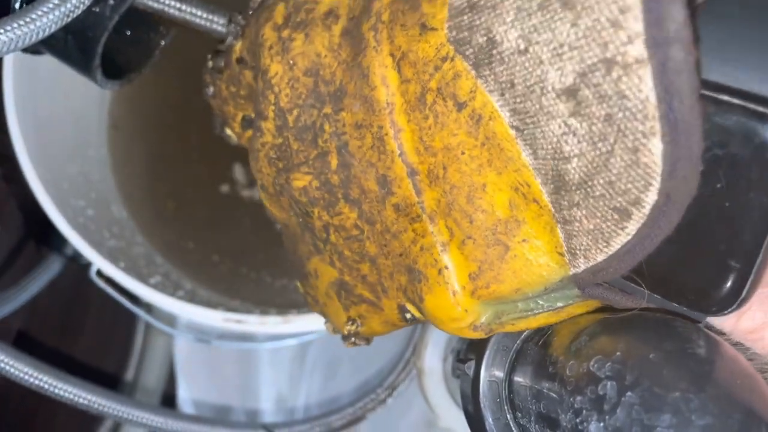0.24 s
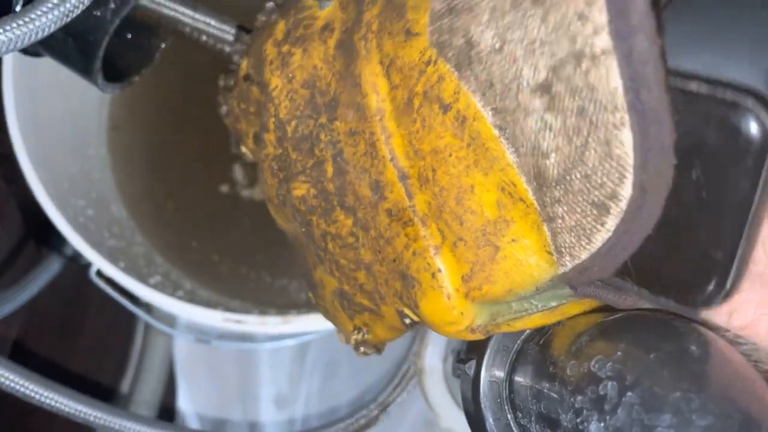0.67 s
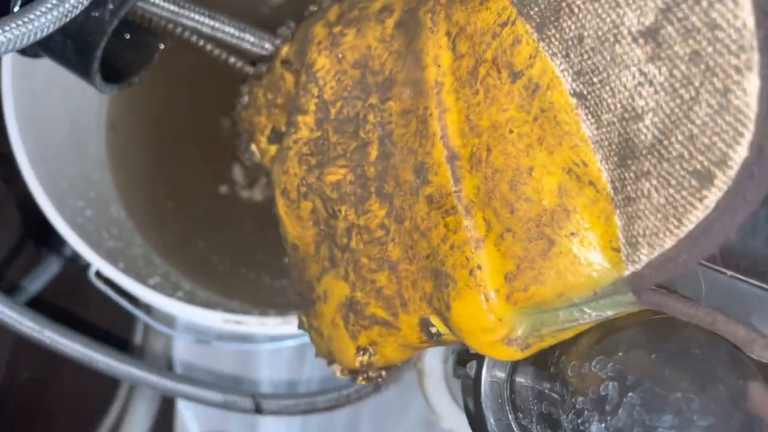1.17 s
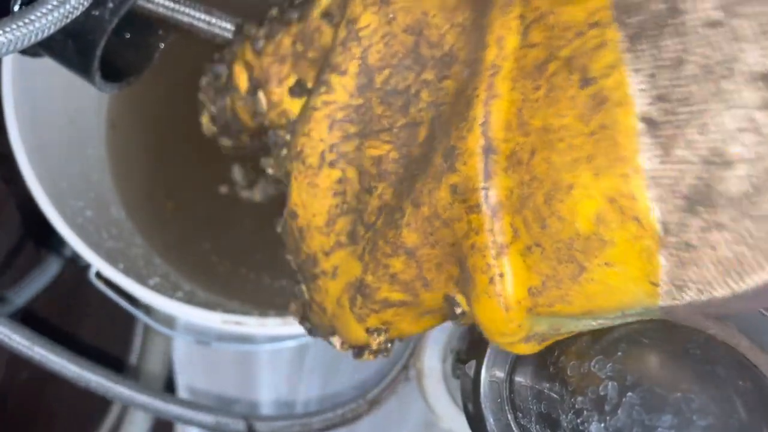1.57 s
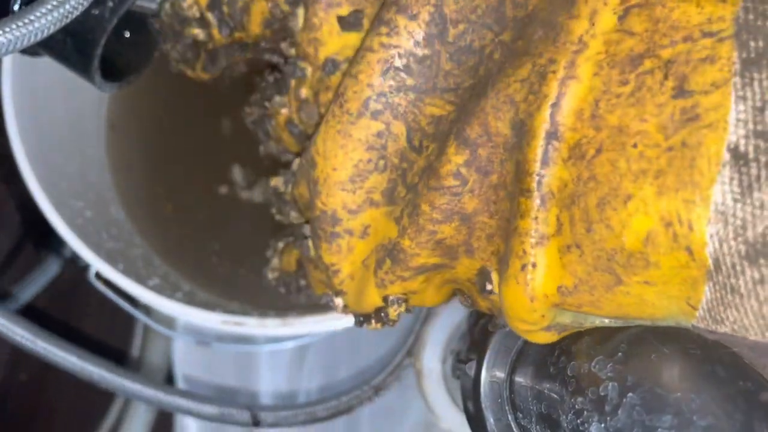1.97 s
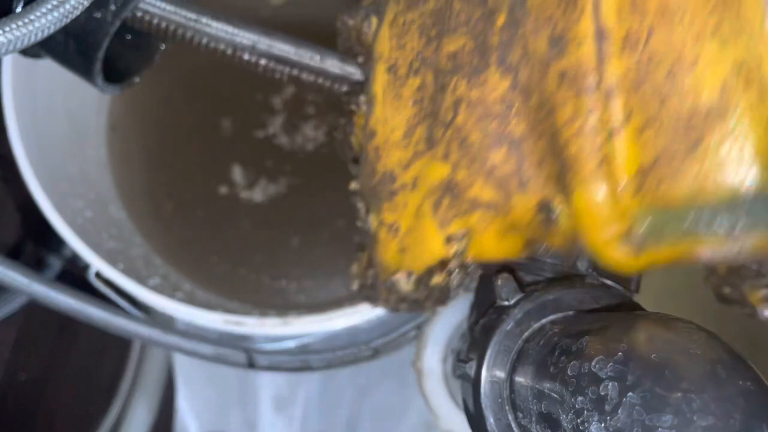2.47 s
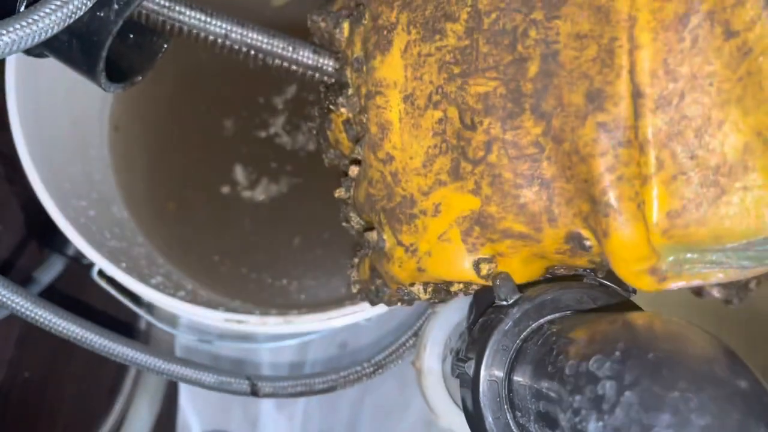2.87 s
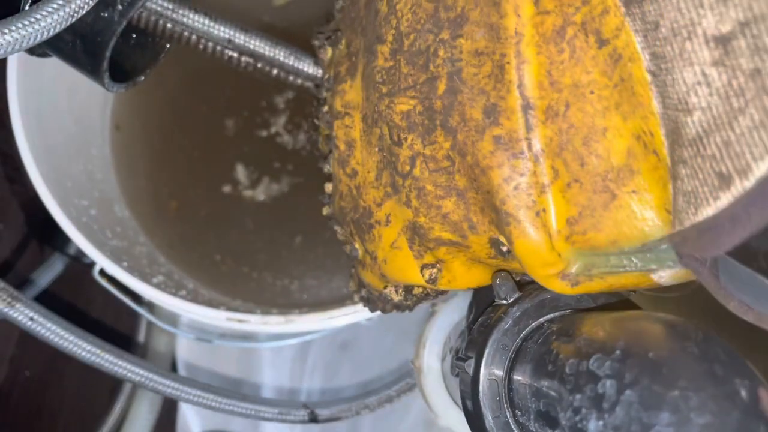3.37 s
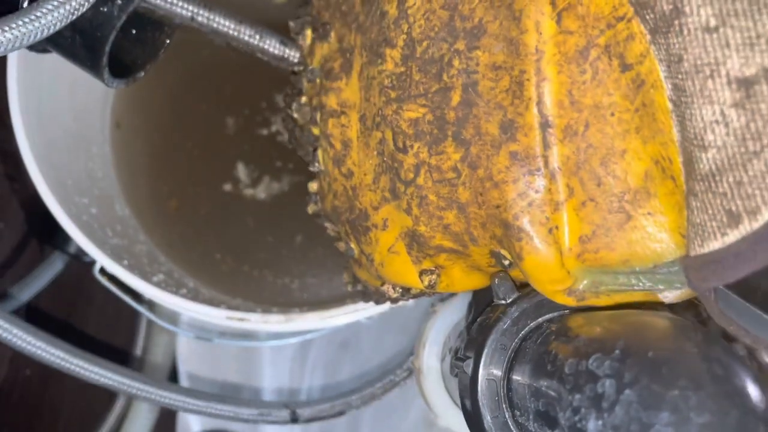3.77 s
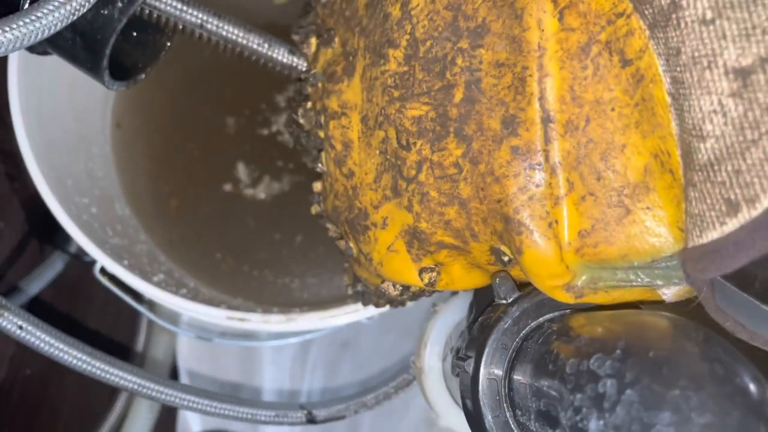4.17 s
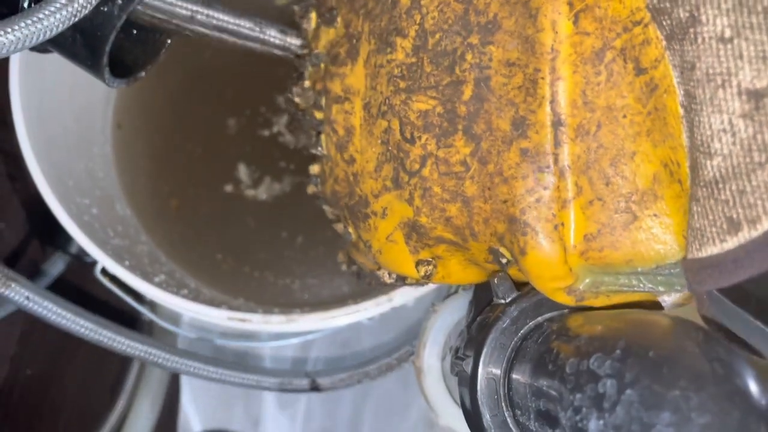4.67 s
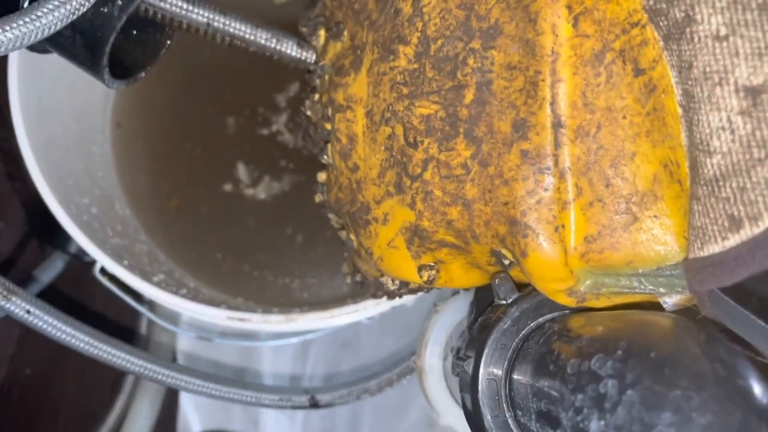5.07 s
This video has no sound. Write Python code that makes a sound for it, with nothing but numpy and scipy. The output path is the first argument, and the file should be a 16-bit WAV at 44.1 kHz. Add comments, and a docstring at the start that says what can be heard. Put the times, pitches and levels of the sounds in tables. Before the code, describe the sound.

A drain-cleaning machine hums, rumbles and hisses close by, its hollow drum rattling and knocking while the steel cable judders through a glove in four pushes.

```python
"""A motor hums and hisses close by in a small room: an electric drain machine spinning its coiled steel cable.
The frame rumbles and thumps, the hollow drum rattles and knocks, short thin tones sound near 12 kHz, and the
cable ticks on steel. Four times the cable is pushed into the pipe: its coils judder through the glove in an
uneven low wave, with rubbing coloured by the pipe's air column. Steady layers are shaped noise and excited
resonances; single blows are dying modes and noise snaps, and the walls answer with a short tail."""
import sys
import numpy as np
from scipy import signal
from scipy.fft import rfft, irfft, next_fast_len
from scipy.io import wavfile
from scipy.ndimage import uniform_filter1d, map_coordinates

SR = 44100
rng = np.random.default_rng(int(sys.argv[2]) if len(sys.argv) > 2 else 0)


def store_pcm(level_fs):
    """Save levels as 16-bit WAV."""
    pcm = np.round(np.clip(level_fs, -1, 1) * 32767).astype(np.int16)
    wavfile.write(sys.argv[1], SR, np.atleast_2d(pcm).T)


N = 235273
T = np.arange(N) / SR  # time of each sample [s]

# The running cable: (time [s], frame rumble [dB], rattle [dB], scrape [dB])
RUNNING_LEVELS = [(0.0, -31, -35, -34.5), (0.11, -23.5, -31.5, -35), (0.15, -25, -31.5, -37.5),
                  (0.22, -26, -27.5, -38), (0.6, -24, -29, -35), (0.8, -34, -32.5, -34),
                  (0.93, -22, -28.5, -33.5), (1.01, -28.5, -34.5, -33), (1.1, -30.5, -32, -34.5),
                  (1.45, -33.5, -34.5, -34.5), (1.64, -22, -24.5, -35.5), (1.83, -30.5, -36, -34.5),
                  (1.95, -27, -31, -34.5), (2.22, -30.5, -30.5, -34), (2.39, -24, -32, -33.5),
                  (2.5, -34, -32, -34), (2.64, -28.5, -32, -33.5), (2.8, -35, -36.5, -34.5),
                  (3.13, -26.5, -28.5, -32), (3.33, -27, -32, -33), (3.9, -24.5, -35, -32.5),
                  (4.1, -31, -29.5, -31.5), (4.25, -26, -30.5, -34), (4.75, -15.5, -30, -38),
                  (5.04, -25, -25, -29.5), (5.2, -26, -28.5, -33.5), (5.33, -19, -32.5, -32.5)]
# One list per push: (time [s], coils passing [Hz], judder [dB], rub [dB], rasp [dB])
CABLE_PUSHES = [
    [(0.24, 72.3, -22, -39, -46), (0.262, 74.4, -18, -36, -38), (0.296, 78, -14.5, -24, -34),
     (0.312, 90, -28, -24, -29.5), (0.325, 102, -13, -20, -29), (0.342, 110.6, -23, -18, -26),
     (0.358, 114, -6, -19, -28.5), (0.38, 101.4, -24, -20, -28), (0.398, 104, -17, -18.5, -33),
     (0.42, 118.3, -31, -18.5, -31), (0.446, 130.5, -34, -18, -27.5), (0.485, 131.8, -24, -15, -25.5),
     (0.53, 136.4, -22, -17.5, -35), (0.56, 130, -34, -25.5, -54), (0.59, 108.9, -22, -30.5, -51),
     (0.62, 99, -26, -39, -52)],
    [(3.42, 68.3, -11, -40, -50), (3.465, 69.7, -22, -32, -42), (3.49, 70.3, -12, -26.5, -48),
     (3.525, 71.1, -6.5, -23.5, -34), (3.55, 82, -13, -24, -41), (3.575, 99.9, -11, -19.5, -26),
     (3.606, 109.8, -6, -18.5, -27.5), (3.632, 116.4, -11, -20.5, -28), (3.66, 123, -8.5, -16, -28),
     (3.685, 117, -19, -30, -37), (3.718, 86.3, -9, -24, -41), (3.75, 73.9, -9.5, -29, -34),
     (3.775, 72, -11, -24.5, -37), (3.797, 70.7, -8.5, -32, -35), (3.815, 70.3, -21, -41, -55),
     (3.86, 69.5, -23, -37, -39), (3.89, 68.7, -20, -40, -29)],
    [(3.97, 90.5, -45, -35, -48), (4.005, 96.5, -39, -32, -54), (4.045, 111, -33, -29, -48),
     (4.09, 120.9, -26, -29, -52), (4.165, 123.4, -31, -27.5, -42), (4.195, 121.4, -32, -38, -47),
     (4.23, 117.5, -42, -36, -43)],
    [(4.245, 70, -34, -46, -46), (4.275, 70.2, -31, -46, -38), (4.297, 71, -12, -46, -32),
     (4.32, 72, -25, -44, -33), (4.348, 74.5, -9, -26, -32), (4.375, 78.7, -9.5, -27.5, -36),
     (4.408, 81, -13, -25, -33), (4.456, 112.8, -7.5, -22, -29.5), (4.49, 126, -9.5, -21, -31),
     (4.51, 128.6, -20, -20.5, -32), (4.53, 136, -13, -17, -26), (4.548, 143.4, -12, -15.5, -26.5),
     (4.59, 155.5, -16, -18.5, -27), (4.612, 161, -12.5, -16.5, -27), (4.64, 162.7, -17.5, -12, -24),
     (4.67, 160, -14, -17.5, -33), (4.7, 120.8, -13.5, -24, -39), (4.73, 90.6, -12, -34, -52),
     (4.78, 75, -34, -50, -57), (4.82, 71.6, -24, -32, -34), (4.845, 71, -8, -42, -36),
     (4.89, 67.5, -20, -48, -42), (4.95, 64.3, -40, -37, -43)],
]
# Colour of each push: (upper pipe tones [dB], edge above them [dB], overtones of the judder [dB])
PUSH_COLOURS = [(0, -1, 1.5), (0, -2, -1.5), (0, 8, 15), (2, 0.5, -3.5)]
# Blows of the drum: (time [s], level [dB], low thud [dB], middle ring [dB], hard edge [dB])
DRUM_KNOCKS = [(0.06, -22, -11.5, -17, -9), (0.194, -30, -8, -5, -11), (0.203, -33, -14, -12, -6),
               (0.339, -18, -22, -3, -6), (0.376, -25, -8, -3, -17), (0.585, -36, -17, -14, -1),
               (0.754, -20.5, -7, -5, -5), (0.795, -37, -17, -4, 5), (0.818, -32.5, -13, -5, 5.5),
               (0.852, -19.5, -12.5, -3.5, -8.5), (1.165, -32, -9, -6, -2), (1.196, -29, -15, -16, 1),
               (1.496, -32, -22, 1, -10), (1.21, -34, -17, -6, -4), (1.507, -20.5, -2, -2.5, -4),
               (1.583, -36, -14, -11, 4), (1.884, -21.5, -2, -2.5, -6.5), (1.969, -33, -17, -3.5, 2.5),
               (2.109, -24.5, -11, -15, -12), (2.262, -19.5, -24, -13, -20), (2.281, -22, -28, -22, -21),
               (2.32, -28, -14, -5, -10), (2.343, -22, -18, -19, -2.5), (2.514, -31, -18, -17, 0),
               (2.695, -29, -14, -8, -5), (2.723, -24.5, -16, -16, -3.5), (2.876, -32.5, -10, -5.5, -9),
               (3.001, -31, -6, -3, -11), (3.065, -39, -4, -11, -5), (3.106, -26, -7.5, -22, -2),
               (3.138, -33.5, -22, 0.5, 2), (3.858, -30.5, -14, -12, 2), (4.04, -25, -17, -21, -16),
               (4.148, -38, -19, -15, 1), (4.224, -29, -25, -3, -6), (4.826, -25.5, -16, -19, -8.5),
               (4.978, -27.5, -11, -8, -2.5)]
# Modes of the hollow drum: (frequency [Hz], level [dB], T60 when struck [s])
DRUM_MODES = [(220, 19, 0.035), (386, 1, 0.03), (580, 8, 0.02), (690, 2, 0.016), (810, 0, 0.014),
              (925, 10, 0.024), (1080, -1, 0.014), (1320, -5, 0.018)]
# Rocking of the frame: (time [s], level [dB], pitch [Hz])
FRAME_THUMPS = [(0.082, -13, 80), (0.627, -11, 66), (0.869, -6.5, 75), (0.963, -8.5, 112),
                (1.588, -15.5, 77.5), (1.882, -13, 73), (2.129, -12, 70.6), (2.734, -15.5, 66),
                (2.903, -16, 66.6), (3.036, -16, 77), (3.128, -14.5, 111), (5.099, -9, 82)]
# Cable on steel: (time [s], level [dB], brightness [dB], pitch that stands out [Hz])
CABLE_TICKS = [(0.2044, -23.5, -26, 1420), (0.3401, -14.5, -8, 2370), (0.852, -21, -10, 2830),
               (0.9195, -11.5, -4, 1490), (1.073, -23, -20, 2200), (1.2441, -19, -5, 3270),
               (1.5948, -14, -2, 2550), (1.606, -19, -22, 2070), (1.6776, -23.5, -10, 1800),
               (1.8522, -26, -4, 2240), (2.3446, -21.5, 3.5, 1510), (2.4214, -19, -12, 1820),
               (2.5152, -18, -16, 2350), (2.6214, -17.5, -20, 1800), (2.642, -22, -20, 1550),
               (2.66, -28, -16, 2070), (2.793, -30, -25, 1820), (2.826, -25.5, -24, 1810),
               (3.2974, -20, -8, 1800), (3.4655, -20, -4, 1570), (3.5224, -27, 7, 1780),
               (3.6007, -23.5, 8, 5370), (3.7489, -18.5, -7, 1750), (3.9993, -21, -18, 1830),
               (4.104, -24, -18, 1820), (4.173, -20.5, -20, 1820), (4.2732, -20, -1, 1710),
               (4.5276, -22, 6, 1550), (4.6189, -23, -1, 2340), (4.636, -14, 2, 2620),
               (4.937, -18, -22, 1560), (5.0974, -15.5, -8, 1590)]
# Modes of the steel: (frequency [Hz], level [dB], T60 when struck [s])
STEEL_MODES = [(1550, -8, 0.075), (1827, -5, 0.045), (2070, -10.5, 0.13), (2342, -5.5, 0.063),
               (2823, -7.5, 0.042), (3525, -5, 0.028), (4920, -5, 0.076), (5290, -6, 0.032),
               (7050, -7, 0.044)]
# Short thin tones near 12 kHz: (time [s], level [dB], upper tone over the lower [dB])
THIN_TONES = [(0.19, -49, 5), (1.073, -29.5, -9), (1.48, -40, -4), (1.68, -42, -6), (1.83, -42, 0),
              (1.875, -42, 0), (1.91, -40, -4), (1.945, -39, -4), (2.4249, -32, -5), (2.576, -37, -5),
              (2.6329, -35, -15), (3.2994, -38, 2), (3.463, -35, -4), (3.635, -42, 6), (3.803, -36, -10),
              (3.882, -41, 5), (4.085, -42, 2), (4.182, -35.5, 1), (4.292, -38, 5), (4.3495, -40, 3),
              (4.875, -44, 4)]
# The lower and upper thin tone: (frequency [Hz])
TONE_PITCHES = [11820, 12240]
# A short squeal early in the first push: (time [s], length [s], frequency [Hz], level [dB])
PUSH_CREAK = (.278, .06, 2080, -25)
# Magnetic hum of the motor: (frequency [Hz], level [dB], wavering [dB])
HUM_TONES = [(120, -44.5, 3), (241, -33, 3), (360, -36.5, 1.3), (596, -45, 2.5)]
# Noise colours, before levelling to rms 1: (frequency [Hz], relative gain [dB])
RUMBLE_COLOUR = [(12, -120), (25, -45), (40, -10.5), (55, 0), (75, -1.5), (120, -3), (160, -13.5),
                 (230, -26), (500, -120)]
RATTLE_COLOUR = [(50, -120), (120, -22), (200, 1.5), (300, 5.5), (450, -2.5), (650, -10), (1000, -13),
                 (1400, -14), (2500, -19), (5000, -120)]
SCRAPE_COLOUR = [(200, -120), (500, 3), (1000, 5.5), (1400, 1.5), (2000, -6), (3000, -9), (5300, -6.5),
                 (5700, -13.5), (7000, -11.5), (9000, -33.5), (10500, -26), (14000, -120)]
HISS_COLOUR = [(2500, -120), (5000, -30), (7200, -8), (8200, -2), (9300, 0), (10500, -3), (12000, -4),
               (14000, -7), (16000, -7)]
RUB_COLOUR = [(60, -120), (130, 8), (200, -7), (300, -0.5), (450, -5.5), (650, -5), (1080, -8.5),
              (1200, -12), (2200, -17), (5000, -120)]
RASP_COLOUR = [(500, -120), (1200, -3), (2000, -3), (3000, -2), (4600, -2.5), (5250, -1.5), (5600, -5.5),
               (7500, -6.5), (9300, 5.5), (10500, -9), (16000, -12)]
# Air column of the pipe: (frequency [Hz], width [Hz], gain [dB])
PIPE_RESONANCES = [(278, 51, 3), (417, 60, 2), (516, 45, 2), (617, 19, 1), (679, 16, 6), (808, 17, 4),
                   (894, 53, -10), (1045, 21, -2.5)]
# Likeness of the two microphone ports: (frequency [Hz], likeness [0 to 1])
PORT_LIKENESS = [(60, 0.96), (140, 0.92), (300, 0.88), (700, 0.18), (3000, 0.48), (5000, 0.45),
                 (7000, 0.76), (8200, 1), (9400, 1), (10500, 0.1), (12200, 0.99), (12900, .9999)]
# Phase between the ports: (frequency [Hz], phase [rad])
PORT_PHASE = [(60, 0.24), (150, 0.44), (200, -2.5), (270, -2.5), (330, -3.6), (400, -5.6), (580, -5.8),
              (690, -6.3), (800, -7.7), (925, -8.3), (1050, -8.2), (1250, -8.7), (1550, -7.7), (1800, -6.1),
              (2300, -5.9), (2800, -5.4), (3500, -5.7), (5000, -5.7), (6500, -7.5), (8000, -9.1),
              (9400, -9.6), (11000, -10.9), (12000, -11.9), (13000, -12.57)]
# Level tilt between the ports: (frequency [Hz], left over right [dB])
PORT_TILT = [(60, 4), (92, 3.5), (150, 3), (200, 9), (260, 3), (330, -1), (400, -3), (480, 0), (580, -2),
             (690, 0), (925, 1), (1250, 3), (1800, 1), (2800, 4), (5000, 4), (6500, 3.5), (9000, 0),
             (15000, 0)]
# Decay of the room: (frequency [Hz], T60 [s])
ROOM_DECAY = [(200, 0.093), (2000, 0.03), (10000, 0.16)]

SING_DB, SING_SWING_DB = -7, 1  # singing steel over the scrape; its random swing
REGRIP_S, DAMPED_DB = 2.67, -10  # the glove shifts its hold and damps the singing from then on
HISS_DB, HISS_RISE_DB_PER_S, HISS_FOLLOWS = -37.5, 0.02, 0.29  # base level, drift, share of the scrape's swings
CRACK_DB, CRACK_T60_S = -2, 0.025  # dull rattle at the start of a knock
PRESS_S = 0.007  # the cable stays on the drum this long and keeps it ringing
FAVOUR_DB, FAVOUR_WIDTH = 10, 0.13  # lift of the modes near the point of contact; its reach in log pitch
UPPER_HZ, EDGE_HZ = 487, 1300  # where the upper pipe tones and the edge begin
CRACKLE_DB = 3.2  # grit of the glove breaks the rubbing into grains
SHAKE_DB = -15  # loose shaking of the frame, relative to the judder
RUB_LEFT_DB = 5  # the pipe mouth lies to the left
TOP_HZ = 15900  # band limit


def amp(db):
    """Gain of a level in dB."""
    return 10 ** (np.asarray(db) / 20)


def unit(x):
    """x at rms 1."""
    return x / np.sqrt(np.mean(np.abs(x) ** 2) + 1e-20)


def along(points, hz):
    """(Hz, value) points read on a log frequency axis."""
    f, v = np.transpose(points)
    return np.interp(np.log(hz + 1), np.log(f + 1), v)


def curves(rows):
    """One value per sample for each column after the time."""
    s, *cols = np.transpose(rows)
    return [np.interp(T, s, c) for c in cols]


def wobble(rate):
    """A smooth random curve with rate knots a second."""
    knots = rng.standard_normal(int(N * rate / SR) + 4)
    return map_coordinates(knots, [T * rate])


def filtered(x, response):
    """x times a complex response of frequency."""
    m = next_fast_len(N + SR // 2)
    return irfft(rfft(x, m) * response(np.fft.rfftfreq(m, 1 / SR)), m)[..., :N]


def rush(colour, patchy_db, grit_db):
    """Two unrelated noises sharing patches of gain and a gritty flutter, together at rms 1."""
    z = signal.stft(rng.standard_normal((2, N)), nperseg=512)[2]
    field = uniform_filter1d(rng.standard_normal(z.shape[1:]), size=6, axis=0)
    field = uniform_filter1d(field, size=8, axis=1)
    pair = signal.istft(z * amp(patchy_db * unit(field)), nperseg=512)[1][:, :N]
    pair = pair * amp(grit_db * (wobble(150) + wobble(22.02)))
    return unit(filtered(pair, lambda hz: amp(along(colour, hz))))


def steady(x, span_s):
    """x with its slow chance swells levelled out."""
    power = uniform_filter1d(np.sum(x ** 2, axis=-2, keepdims=True), size=int(span_s * SR))
    return unit(x / np.sqrt(np.abs(power) + 1e-9))


def struck(events, ring, length):
    """The sum of ring(t, columns) started at each event, with its level."""
    out, t = np.zeros(N + SR), np.arange(int(length * SR)) / SR
    for s, db, *cols in events:
        out[round(s * SR):][:len(t)] += amp(db) * ring(t, *cols)
    return out[:N]


def modes(table, t, tilt_db, attack, hold=0):
    """Modes that die after a hold, at slightly new strengths and pitches for each blow."""
    draw = rng.standard_normal((len(table), 2))
    free = np.clip(t - hold, 0, None)
    total = np.zeros(len(t))
    for (hz, db, t60), (strength, detune) in zip(table, draw):
        decay = amp(db + tilt_db(hz) + 1.5 * strength - 60 * free / t60)
        total += decay * np.sin(2 * np.pi * hz * (1 + 0.02 * detune) * t)
    return total * (1 - np.exp(-t / attack))


def excited(table, rate, widen):
    """Many small irregular contacts ring the modes of a table, their widths scaled by widen."""
    hits = rng.random((2, N)) < rate / SR
    taps = hits * rng.standard_normal((2, N)) * amp(2.0 * wobble(25.0))

    def body(f):
        total = 0
        for k, (hz, db, t60) in enumerate(table):
            damping = 1j * f * widen / t60
            total = total + (-1) ** k * amp(db) * damping / (hz * hz - f * f + damping)
        return total
    return unit(filtered(taps, body))


def shaking():
    """Low rumble of the frame, more even than plain noise."""
    rumble = rush(RUMBLE_COLOUR, patchy_db=1.5, grit_db=1.0)
    size = np.abs(signal.hilbert(rumble[0], next_fast_len(N))[:N])
    return unit(rumble / (size + 1.0) ** 0.17)


def hum():
    """Magnetic hum: steady tones near multiples of 120 Hz, wavering at random in level and phase."""
    total = np.zeros(N)
    for hz, db, waver_db in HUM_TONES:
        level = amp(db + waver_db * wobble(9.9))
        total += level * np.sin(2 * np.pi * hz * T + 0.4 * waver_db * wobble(11))
    return total


def machine():
    """Frame rumble, cable rattle in the drum, scraping with singing steel modes, and air hiss."""
    rumble_db, rattle_db, scrape_db = curves(RUNNING_LEVELS)
    damped_db = DAMPED_DB * np.clip((T - REGRIP_S) / 0.032, 0, 1)
    sing_db = scrape_db + SING_DB + SING_SWING_DB * wobble(15) + damped_db
    hiss_db = HISS_DB + HISS_RISE_DB_PER_S * T + HISS_FOLLOWS * (scrape_db - scrape_db.mean())
    rattle = rush(RATTLE_COLOUR, patchy_db=2.0, grit_db=1.36)
    rattle = rattle + amp(-11.5) * excited(DRUM_MODES, rate=78, widen=0.86)
    scrape = rush(SCRAPE_COLOUR, patchy_db=2.5, grit_db=0.6)
    singing = excited(STEEL_MODES, rate=1200, widen=2.4)
    hiss = rush(HISS_COLOUR, patchy_db=0.6, grit_db=0.4)
    return (amp(rumble_db + 2.25 * wobble(13)) * shaking()
            + amp(rattle_db + 0.44 * wobble(2.8)) * rattle
            + amp(scrape_db + 1.24 * wobble(12)) * scrape
            + amp(sing_db) * singing
            + amp(hiss_db) * hiss)


def knocks():
    """The hollow drum cracks and rings briefly; its lowest mode enters a few milliseconds after the others."""
    def ring(t, thud_db, ring_db, edge_db):
        def shell_tilt_db(hz):
            return edge_db * (hz > 750) + ring_db * (500 < hz < 750)

        shell = modes(DRUM_MODES[1:], t, shell_tilt_db, attack=0.001, hold=PRESS_S)
        late = np.clip(t - 0.007, 0, None)
        thud = modes(DRUM_MODES[:1], late, lambda hz: thud_db, attack=0.0041, hold=0.004)
        dull = rng.standard_normal(len(t))
        for _ in range(3):  # soft contact: little above 1 kHz
            dull = uniform_filter1d(dull, size=22)
        dull = unit(dull - uniform_filter1d(dull, size=90))
        crack = amp(CRACK_DB - 60 * t / CRACK_T60_S) * (1 - np.exp(-t / 0.0024)) * dull
        return crack + shell + thud
    return struck(DRUM_KNOCKS, ring, 0.12)


def thumps():
    """The frame rocks for a few cycles: a low sine that dies away."""
    def rock(t, hz):
        return amp(-60 * t / 0.15) * (1 - np.exp(-t / 0.0036)) * np.sin(2 * np.pi * hz * t)
    return struck(FRAME_THUMPS, rock, 0.25)


def thin_tones():
    """Short thin tones near 12 kHz: a slightly rough pair that rises and fades within hundredths of a second."""
    def ring(t, upper_db):
        rough = uniform_filter1d(rng.standard_normal((2, len(t))), size=120, axis=1)
        tones = np.sin(2 * np.pi * np.outer(TONE_PITCHES, t))
        low, high = (0.85 + 0.3 * unit(rough)) * tones
        swell = (t / 0.013 * np.exp(1 - t / 0.013)) ** 2
        return swell * (low + amp(upper_db) * high)
    return struck(THIN_TONES, ring, 0.079)


def ticks():
    """A short broad snap and the steel modes; the point of contact favours those near one pitch."""
    def ring(t, bright_db, near_hz):
        white = 1.4 * uniform_filter1d(rng.standard_normal(len(t)), size=4)  # little above 8 kHz
        smooth = uniform_filter1d(white, size=9)
        dull, bright = smooth - uniform_filter1d(white, size=40), white - smooth
        snap = amp(3 - 60 * t / 0.04) * dull + amp(1 + bright_db - 60 * t / 0.033) * bright

        def tilt_db(hz):
            favour_db = FAVOUR_DB * np.exp(-(np.log(hz / near_hz) / FAVOUR_WIDTH) ** 2)
            return (bright_db + 0.5) * (hz > 3200) + favour_db

        steel = modes(STEEL_MODES, t, tilt_db, attack=0.001, hold=0.007)
        return amp(-5) * snap + amp(-14.5) * steel
    return struck(CABLE_TICKS, ring, 0.1)


def during(rows):
    """1 inside the span of a table, with short fades."""
    return np.clip(np.minimum(T - rows[0][0], rows[-1][0] - T) / 0.018, 0, 1)


def pipe_ranges(f):
    """Standing waves of the pipe's air column, split into low tones, upper tones and edge."""
    column = 0.4
    for hz, width, db in PIPE_RESONANCES:
        column = column + amp(db) / (1 + ((f - hz) / width * 2) ** 2)
    return column * np.array([[f < UPPER_HZ], [(f >= UPPER_HZ) & (f < EDGE_HZ)], [f >= EDGE_HZ]])


def pushes():
    """Coils pass in turn: an uneven low wave at the passing rate.

    Rubbing and rasping friction follow their own levels, with a barely felt ripple at the passing rate.
    """
    wave, rough, rubbing = np.zeros(N), np.zeros((2, N)), np.zeros((2, N))
    shake = shaking()
    grains = rush(RUB_COLOUR, patchy_db=0.8, grit_db=0) * amp(CRACKLE_DB * wobble(220))
    rasp = steady(rush(RASP_COLOUR, patchy_db=2.0, grit_db=1.4), span_s=0.03)
    low, upper, edge = unit(filtered(grains, pipe_ranges)) / np.sqrt(3)
    for rows, (upper_db, edge_db, overtone_db) in zip(CABLE_PUSHES, PUSH_COLOURS):
        rub = steady(low + amp(upper_db) * upper + amp(edge_db) * edge, span_s=0.025)
        hz, judder_db, rub_db, rasp_db = curves(rows)
        gate = during(rows)
        phase = 2 * np.pi * np.cumsum(hz * (1 + 0.035 * wobble(45))) / SR
        overtones = (amp(-13.5) * np.cos(2 * phase) + amp(-18.5) * np.sin(3 * phase)
                     + amp(-19.5) * np.cos(4 * phase))
        shape = np.sin(phase) + amp(overtone_db) * overtones
        wave += gate * amp(judder_db + 1.2 * wobble(40)) * shape
        ripple = 1 + 0.043 * np.cos(phase + 1.5)
        rubbing += gate * ripple * amp(rub_db) * rub
        rough += gate * (ripple * amp(rasp_db) * rasp + amp(judder_db + SHAKE_DB) * shake)
    return wave * [[1], [0.3]] + rough, rubbing


def creak():
    """One rough tone that swells and stops, jittered in level and phase."""
    s, length, hz, db = PUSH_CREAK
    progress = np.clip((T - s) / length, 0, 1)
    level = amp(db + 1.6 * wobble(119)) * np.sin(np.pi * progress)
    return level * np.sin(2 * np.pi * hz * T + 1.2 * wobble(142.0))


def room(x):
    """Each frequency of the walls' answer dies at its own speed."""
    hz, t, z = signal.stft(rng.standard_normal((2, SR // 3)), SR, nperseg=256)
    decay = amp(-60 * t / along(ROOM_DECAY, hz)[:, None])
    tail = signal.istft(z * decay, SR, nperseg=256)[1]
    return signal.fftconvolve(x[None], tail / np.linalg.norm(tail[0]), axes=1)[:, :N]


def ports(pair):
    """Two microphone ports: a shared and an unshared part, a phase turn and a level tilt between them."""
    def shares(hz):
        angle = np.arccos(np.clip(along(PORT_LIKENESS, hz), 0, 1)) / 2
        return np.array([np.cos(angle), np.sin(angle)])

    def turn_and_tilt(hz):  # half to each side
        left = amp(along(PORT_TILT, hz) / 2) * np.exp(0.5j * along(PORT_PHASE, hz))
        return np.array([left, 1 / left])

    same, other = filtered(pair, shares)
    return filtered(np.array([same + other, same - other]), turn_and_tilt)


def scene():
    """Everything reaches the ports; knocks, ticks, thin tones and creak also come back from the walls."""
    echoed = knocks() + ticks() + thin_tones() + creak()
    direct = echoed + thumps() + hum()
    judder, rubbing = pushes()
    around = machine() + judder + direct * [[1], [0.3]] + amp(-9.0) * room(echoed)
    to_left = amp([[RUB_LEFT_DB / 2], [-RUB_LEFT_DB / 2]])
    return ports(around) + to_left * ports(rubbing)


def record(dry):
    """Peaks are rounded off softly; the deepest bass is cut and nothing is kept above the band limit."""
    soft = dry / (1 + np.abs(dry / 0.95) ** 6) ** (1 / 6)
    return filtered(soft, lambda hz: (hz < TOP_HZ) / np.sqrt(1 + (42 / (hz + 1)) ** 6))


dry = scene()
out = record(dry)
store_pcm(out)
```